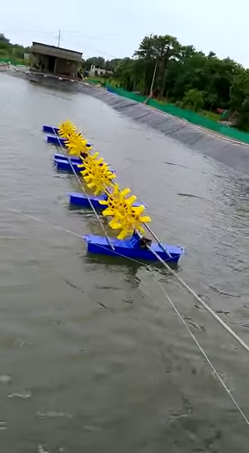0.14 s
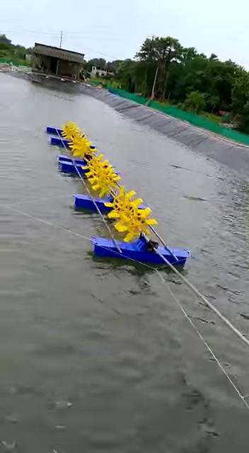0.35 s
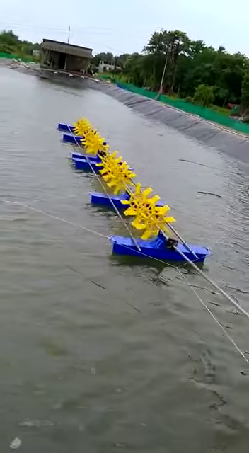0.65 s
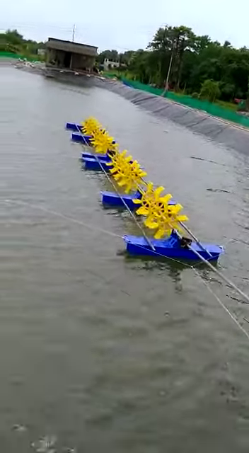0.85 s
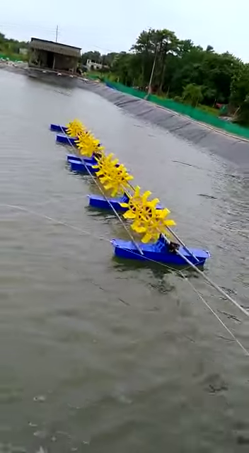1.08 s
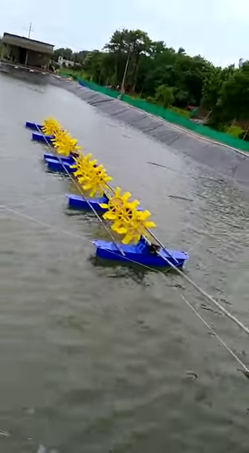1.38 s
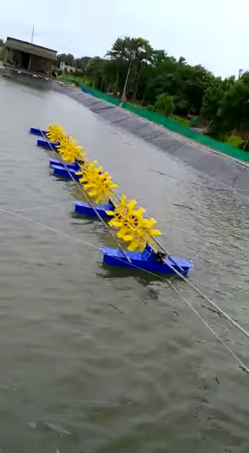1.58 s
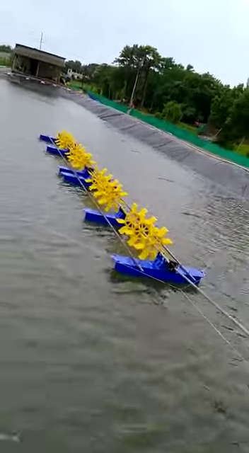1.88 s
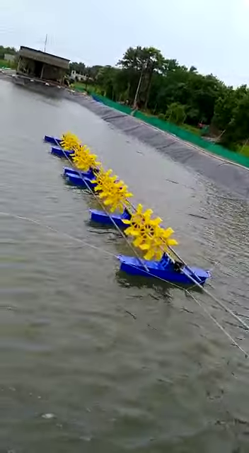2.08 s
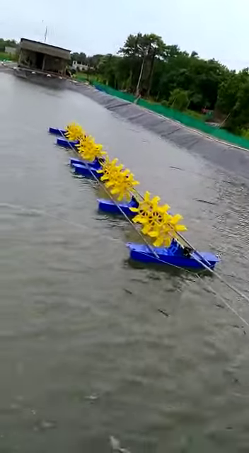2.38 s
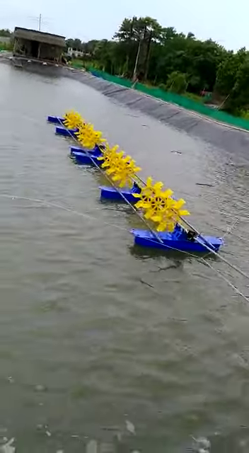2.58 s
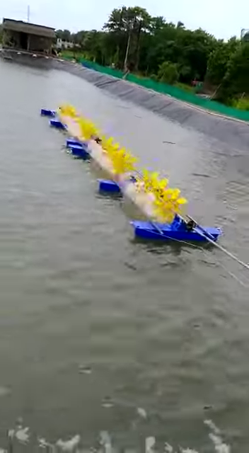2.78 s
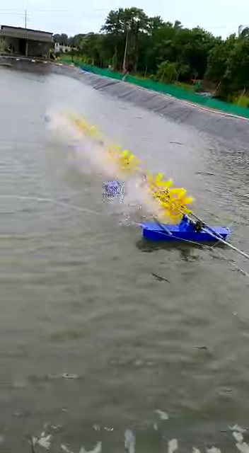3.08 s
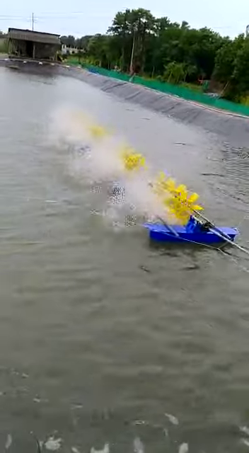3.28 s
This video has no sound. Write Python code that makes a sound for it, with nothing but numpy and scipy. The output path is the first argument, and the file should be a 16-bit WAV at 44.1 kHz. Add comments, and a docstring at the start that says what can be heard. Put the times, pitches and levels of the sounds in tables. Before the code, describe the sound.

A paddlewheel aerator starts up on an open pond. First, gusts of wind rumble and thump on the microphone over faint lapping water; then the machine cuts in with rapid metallic clatter, grinding and splashing spray.

```python
"""A paddlewheel aerator starts on a windy pond. Its motor cuts in at about 2.6 s: the drive coupling
clacks about seventy times a second, the loaded shaft grinds and rings the frame, and the paddles
beat air pockets into the water and throw spray. Gusts and eddies buffet the microphone throughout,
over faint slapping of water, ticking drips and a far bird."""
import sys
import numpy as np
from scipy import signal
from scipy.io import wavfile
from scipy.ndimage import uniform_filter1d, minimum_filter1d

SR = 44100
rng = np.random.default_rng(int(sys.argv[2]) if len(sys.argv) > 2 else 0)


def wav_out(sig):
    """Save sig, one row per channel (or a flat mono array), as 16-bit PCM at SR to the path in sys.argv[1]."""
    wavfile.write(sys.argv[1], SR, np.round(np.clip(np.atleast_2d(sig).T, -1, 1) * 32767).astype(np.int16))


N = 152145
T = np.arange(N) / SR


def from_db(db):
    """Decibels to gain."""
    return 10 ** (np.asarray(db) / 20)


def rms_one(x):
    """Scale to unit power."""
    return x / np.sqrt(np.mean(x ** 2) + 1e-20)


def curve_db(rows):
    """Per-sample level from (time [s], level [dB]) rows; silent before the first."""
    return np.interp(T, *np.transpose(rows), left=-120)


def at_hz(rows, hz):
    """Columns of a spectral table at one frequency."""
    freqs, *columns = np.transpose(rows)
    return [np.interp(np.log(hz), np.log(freqs), column) for column in columns]


def drift(rate_hz):
    """Smooth random signal, unit RMS."""
    pole = np.exp(-40 * np.pi * rate_hz / SR)
    slow = signal.lfilter([1], [1, -2 * pole, pole * pole], rng.standard_normal(N // 20 + 2002))[2000:]
    return np.interp(np.arange(N) / 20, np.arange(len(slow)), rms_one(slow))


def butter(x, order, hz, kind):
    """Butterworth filter."""
    return signal.sosfilt(signal.butter(order, hz, kind, fs=SR, output="sos"), x)


def resonance(x, hz, width_hz):
    """Two-pole resonator, unity peak gain."""
    r = np.exp(-np.pi * width_hz / SR)
    feedback = [1, -2 * r * np.cos(2 * np.pi * hz / SR), r * r]
    return signal.lfilter(np.array([1, 0, -1]) * (1 - r * r) / 2, feedback, x + 1e-18)


def noise_bands(count):
    """Half-octave bands from 18 Hz up: yields (centre [Hz], noise at unit power per Hz)."""
    edges = 18 * 2 ** (np.arange(count + 1) / 2)
    for low, high in zip(edges, edges[1:]):
        band = butter(rng.standard_normal(N + SR), 2, [low, high], "band")
        band = butter(band, 2, [low, high], "band")[SR:]
        yield np.sqrt(low * high), np.sqrt(high - low) * rms_one(band)


def hiss(spectrum):
    """Shaped noise; each band flickers by up to 2 dB."""
    return sum(band * from_db(at_hz(spectrum, hz)[0] + 2 * np.tanh(drift(31)))
               for hz, band in noise_bands(count=20))


def decays(rows, decay_s):
    """Envelope: a jump at each (time [s], level [dB]), then exponential decay."""
    hits = np.zeros(N)
    for time_s, db in rows:
        if 0 <= time_s * SR < N:
            hits[int(time_s * SR)] += from_db(db)
    return signal.lfilter([1], [1, -np.exp(-1 / (decay_s * SR))], hits + 1e-18)


def ring(force, modes, wander_db=-0.5):
    """Rough contact: noise scaled by the force rings each mode with a wandering share."""
    out = 0
    for hz, width_hz, db in modes:
        gain = from_db(db + wander_db * drift(30)) * np.sqrt(SR / (np.pi * width_hz))
        out += gain * resonance(force * rng.standard_normal(N), hz, width_hz)
    return out / np.sqrt(sum(from_db(db) ** 2 for _, _, db in modes))


def pressure_pulse(t, brightness_hz):
    """One rounded push between two shallow dips."""
    age = np.clip(t * 2 * np.pi * brightness_hz, -100, 100)
    return 2 / np.cosh(age) - 1 / np.cosh(age / 2)


# Open-air spectrum: (frequency [Hz], density [dB per Hz])
AIR_SPECTRUM = [(100, -52), (500, -90), (1100, -91), (2100, -89.5), (2800, -99.5), (4200, -110),
                (11000, -114), (15000, -108)]

def open_air():
    """Low rumble and faint hiss."""
    return hiss(AIR_SPECTRUM)


def lapping(first_s=.087, period_s=.0912, level_db=-46.5):
    """Faint regular slaps of water, perhaps another paddlewheel far off."""
    times_s = np.arange(first_s, N / SR, period_s)
    levels_db = level_db + 2 * rng.standard_normal(len(times_s))
    force = decays(zip(times_s, levels_db), decay_s=.0092)
    slaps = ring(force, modes=[(1320, 500, 0), (2550, 500, -3)])
    return butter(slaps, 4, 2900, "low")


# Bird calls: (onset [s], level [dB])
BIRD_CALLS = [(0.0, -55.5), (1.549, -55.5)]

def bird(start_hz=2170, fall_hz=300, length_s=.17):
    """A far bird's falling, wavering whistles."""
    out = np.zeros(N)
    for onset_s, db in BIRD_CALLS:
        progress = np.clip((T - onset_s) / length_s, 0, 1)
        pitch_hz = start_hz - fall_hz * progress ** 2 + 90 * drift(250)
        envelope = from_db(db) * np.sqrt(np.abs(np.sin(np.pi * progress)))
        out += envelope * np.sin(2 * np.pi * np.cumsum(pitch_hz) / SR)
    return out


# Single drips: (time [s], level [dB], pitch [Hz])
DRIP_TICKS = [(1.159, -49, 8500), (1.699, -38, 14600), (1.962, -45, 14400), (2.334, -46, 6000),
              (2.506, -48, 11000)]
# Droplet patter: (time [s], level [dB])
PATTER_LEVEL = [(0, -72), (1.47, -67), (1.6, -77), (2.22, -73), (2.29, -57.5), (2.39, -73)]

def drips(width_hz=1100, droplets_per_s=3000):
    """Single drips tick over a fine random patter of droplets at the same pitches."""
    ticks = sum(ring(decays([(time_s, db)], decay_s=.001), [(hz, width_hz, 0)])
                for time_s, db, hz in DRIP_TICKS)
    droplets = (rng.random(N) < droplets_per_s / SR) * rng.standard_normal(N)
    pitch_index = rng.integers(0, len(DRIP_TICKS), N)
    patter = sum(resonance(droplets * (pitch_index == k), hz, width_hz)
                 for k, (_, _, hz) in enumerate(DRIP_TICKS))
    return ticks + from_db(curve_db(PATTER_LEVEL) + 2 * drift(10)) * rms_one(patter)


# Gusts: (hold start [s], hold length [s], bass level [dB], upper-band extra [dB])
GUST_HOLDS = [(0.0, 0.1, -24, -2.5), (0.155, 0.5, -23.5, 0), (0.668, .255, -20, 4), (0.979, .25, -24, 3),
              (1.389, 0.025, -31, 11.5), (1.476, 0.055, -22, -13), (1.808, 0.13, -35, -17),
              (2.078, 0.045, -24, -1), (2.4, 0.175, -19.5, -6), (2.544, 0.12, -20.5, 2.5),
              (2.854, 0.29, -25, -24), (3.022, 0.0089, -21, 8.5), (3.119, 0.036, -19.5, 18.5),
              (3.19, 0.085, -23.5, 29), (3.317, 0.12, -22.5, 27.5)]

def gusts(rise_db_per_s=210, fall_db_per_s=420, upper_steepness=1.8, lull_db=-41, reference_db=-21.5):
    """Gusts swell from the lull, hold and fall; returns bass and upper levels [dB re reference]."""
    bass, upper = [], []
    for start_s, hold_s, db, extra_db in GUST_HOLDS:
        drop_db = rise_db_per_s * np.maximum(start_s - T, 0)
        drop_db += fall_db_per_s * np.maximum(T - start_s - hold_s, 0)
        bass.append(db - drop_db)
        upper.append(db + extra_db - upper_steepness * drop_db)
    return [np.maximum(np.max(levels, axis=0), lull_db) - reference_db for levels in (bass, upper)]


# Turbulence: (frequency [Hz], relative density [dB per Hz], gust share [ratio], flutter depth [dB])
WIND_BANDS = [(24.6, -2.5, 0.16, 7), (59, 1, 0.45, -2.2), (141, 0.5, 0.82, 5.5), (260.6, -2.5, 1.07, 2.5),
              (500, -14, 1.4, 5.5), (892, -29.5, 1.22, 5.5), (1720, -48, 4.6, 6), (4150, -80, 1.4, -0.5)]

def wind(level_db=-43, eddy_db=-21, eddies_per_s=220, upper_from_hz=394, upper_full_hz=2400):
    """Turbulence on the microphone: gusts brighten it, bands flutter together, small eddies crackle."""
    bass_db, upper_db = gusts()
    flutter = np.minimum(drift(rate_hz=76), 1.7)
    eddies = (rng.random(N) < eddies_per_s / SR) * rng.uniform(-.52, 1, N)
    eddies *= from_db(eddy_db + (bass_db + upper_db) / 2)
    pulse = pressure_pulse(np.arange(-300, 301) / SR, brightness_hz=750)
    out = signal.fftconvolve(eddies, pulse, "same")
    for hz, band in noise_bands(count=16):
        band_db, gust_share, flutter_db = at_hz(WIND_BANDS, hz)
        upper_share = np.clip(np.log(hz / upper_from_hz) / np.log(upper_full_hz / upper_from_hz), 0, 1)
        gust_db = gust_share * bass_db + upper_share * (upper_db - bass_db)
        out += band * from_db(level_db + band_db + gust_db + flutter_db * flutter)
    return out


# Large eddies: (time [s], peak [dB], brightness [Hz])
EDDY_THUMPS = [(0.195, -11, 730), (.242, -10, 667), (0.321, -14.5, 610), (0.487, -9, 740),
               (.693, -11.5, 720), (0.761, -16, 1090), (.867, -12.5, 1270), (.984, -16, 750),
               (1.063, -18, 696), (1.183, -16.5, 800), (1.508, -14, 620), (2.103, -11, 420),
               (2.494, -9.5, 500), (3.063, -7.5, 840), (3.111, -31, 806), (3.18, -11, 1000),
               (3.218, -11.5, 1480), (3.423, -12, 880)]

def buffets(rebound_s=.00524, rebound_db=-4):
    """Large eddies thump the microphone, each trailed by two duller rebounds of alternating sign."""
    out = np.zeros(N)
    for time_s, db, hz in EDDY_THUMPS:
        out += from_db(db) * pressure_pulse(T - time_s, hz)
        for k in (1, 2):
            lag_s = rebound_s * (k - rng.random())
            rebound = pressure_pulse(T - time_s - lag_s, hz * rng.uniform(.37, 1))
            out += (-1) ** k * from_db(db + k * rebound_db) * rebound
    return out


# Thrown water: (time [s], gain [dB])
SPLASH_GAIN = [(2.6, 1), (2.78, -8), (2.82, -2.5), (3.1, -6.5), (3.45, -1)]
# Spray before the splash gain: (frequency [Hz], density [dB per Hz])
SPRAY_SPECTRUM = [(300, -65), (1500, -77), (3200, -82.5), (5000, -94.5), (8500, -88.5), (15000, -110)]

def paddles(plops_per_s=980, t60_cycles=1.24, tilt_db_per_octave=-10.5, churn_db=-33):
    """Paddles beat short-lived air pockets into the pond and throw hissing spray."""
    pitches_hz = np.geomspace(350, 2300, 16)
    pockets = from_db(3.5 * np.minimum(rng.exponential(1, N), 4)) * rng.choice([-1, 1], N)
    pockets *= rng.random(N) < plops_per_s / SR
    pitch_index = rng.integers(0, len(pitches_hz), N)
    plops = np.zeros(N)
    for k, hz in enumerate(pitches_hz):
        width_hz = np.log(1000) / np.pi * hz / t60_cycles
        gain = from_db(tilt_db_per_octave * np.log2(hz / pitches_hz[0]))
        plops += gain * rms_one(resonance(pockets * (pitch_index == k), hz, width_hz))
    churn = from_db(churn_db) * rms_one(butter(plops, 4, 2800, "low"))
    return from_db(curve_db(SPLASH_GAIN)) * (churn + hiss(SPRAY_SPECTRUM))


CLACK_PERIOD_S = .01429
# Shaft load: (time [s], level [dB])
SHAFT_LOAD = [(2.60, -45), (2.70, -43.5), (2.78, -37), (2.84, -33), (3.0, -37), (3.06, -45.5),
              (3.45, -44.5)]
# Shaft and frame modes: (frequency [Hz], width [Hz], weight [dB])
SHAFT_MODES = [(1595, 98, 7), (1800, 150, 9), (1897, 420, 4), (2140, 87, -1.5), (2524, 97, 3),
               (3560, 1000, -24)]

def shaft(roughness_db=4, repeat_gain=.6):
    """The loaded shaft grinds in its bearings and rings the frame; rough spots recur one clack later."""
    friction = from_db(curve_db(SHAFT_LOAD) + roughness_db * drift(120))
    grind = ring(friction, SHAFT_MODES, wander_db=1.5)
    grind += repeat_gain * np.roll(grind, int(CLACK_PERIOD_S * SR))
    return butter(grind, 2, [1200, 6000], "band")


# Clack force, peaking as the wheels gather speed: (time [s], level [dB])
CLACK_LEVEL = [(2.66, -40), (2.72, -34), (2.785, -40.5), (2.81, -27), (2.97, -23), (3.03, -34.5),
               (3.15, -32.5), (3.23, -50), (3.45, -33)]
# Single hard knocks: (time [s], level [dB])
DRIVE_KNOCKS = [(2.670, -28), (2.686, -18.5), (2.796, -18), (3.298, -25)]
# Steel coupling modes: (frequency [Hz], width [Hz], weight [dB])
COUPLING_MODES = [(3930, 200, -10), (6100, 260, -6), (8500, 900, 0), (13200, 1500, 2), (14500, 1500, 2)]

def drive(start_s=2.5888, run_up_lag_s=.038, run_up_clacks=4.2, sway_clacks=38, spread_db=3.2):
    """The coupling clacks; its rate settles as the motor comes up to speed and sways with the load."""
    clack_index = np.arange(4, 60)
    lag_s = run_up_lag_s * (1 - np.exp(-clack_index / run_up_clacks))
    sway_s = .0016 * np.cos(2 * np.pi * clack_index / sway_clacks)
    times_s = start_s + clack_index * CLACK_PERIOD_S + lag_s - sway_s
    levels_db = np.interp(times_s, *np.transpose(CLACK_LEVEL))
    levels_db += spread_db * rng.standard_normal(len(times_s))
    jitter_s = rng.normal(0, .0004, len(times_s))
    clacks = list(zip(times_s + jitter_s, levels_db))
    impacts = decays(clacks + DRIVE_KNOCKS, decay_s=.0016)
    tails = from_db(-19) * decays(clacks, decay_s=.02)
    return butter(ring(impacts + tails, COUPLING_MODES), 2, 2500, "high")


def scene():
    """Wind, pond and aerator, mono."""
    background = wind() + buffets() + lapping() + open_air() + bird() + drips()
    aerator = drive() + shaft() + paddles()
    return (background + aerator)[None]


def record(dry):
    """Fast peak limiter, then a steep low-pass."""
    ceiling, cutoff_hz = .52, 15650
    gain = np.minimum(1, ceiling / (np.abs(dry) + 1e-9))
    gain = minimum_filter1d(gain, size=181)
    gain = uniform_filter1d(uniform_filter1d(gain, size=91), size=91)
    return signal.sosfilt(signal.ellip(10, .2, 70, cutoff_hz, fs=SR, output="sos"), dry * gain)


dry = scene()
out = record(dry)
wav_out(out)
```